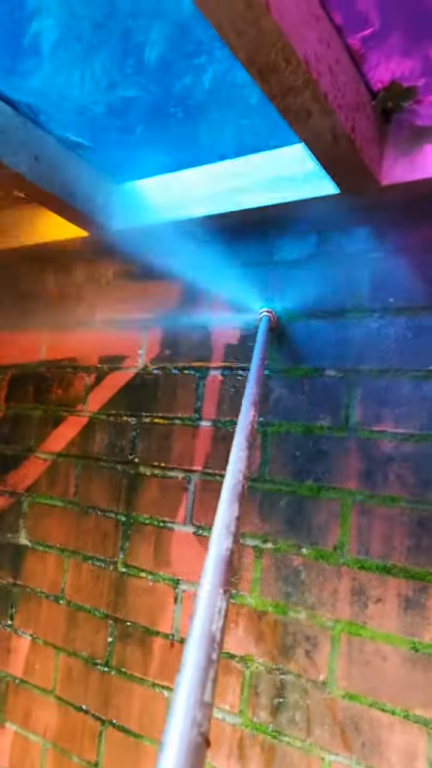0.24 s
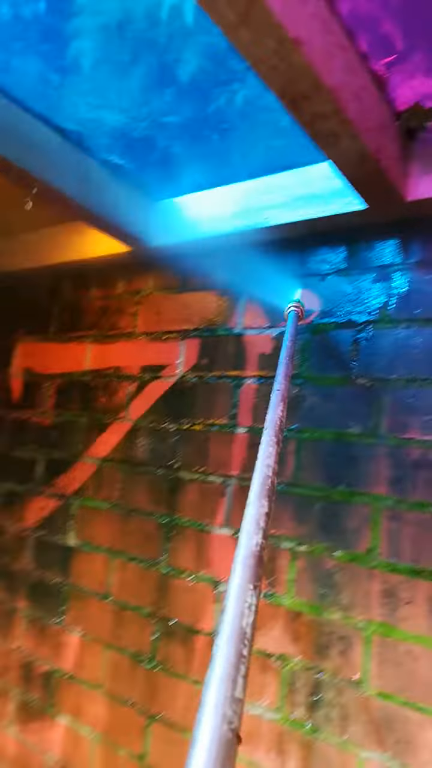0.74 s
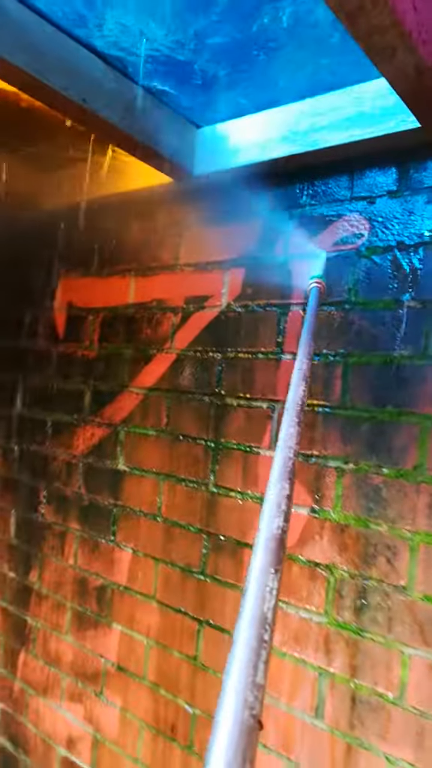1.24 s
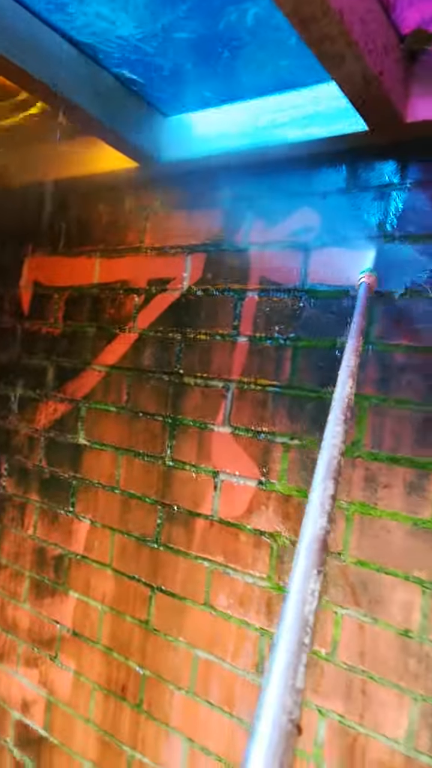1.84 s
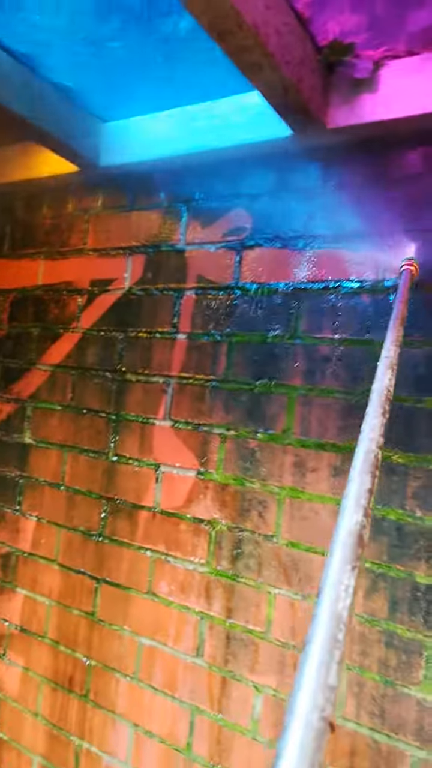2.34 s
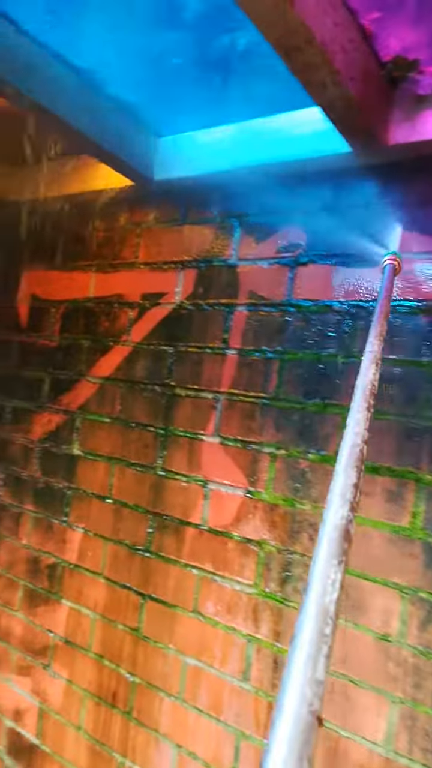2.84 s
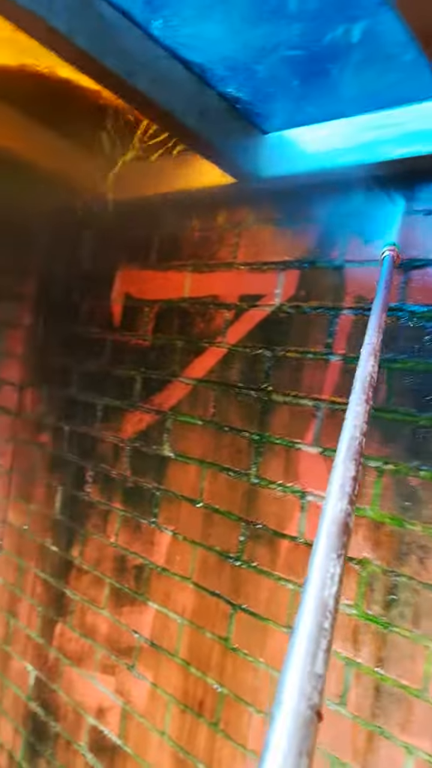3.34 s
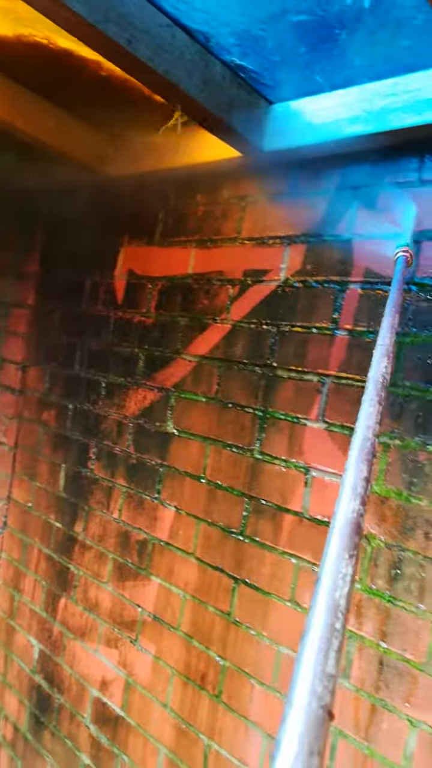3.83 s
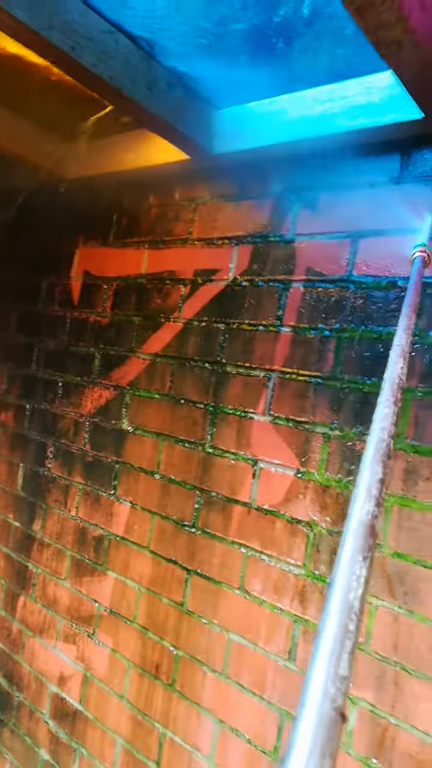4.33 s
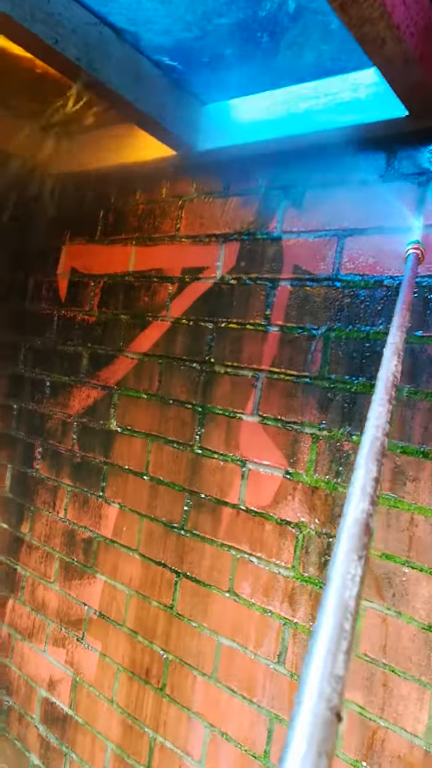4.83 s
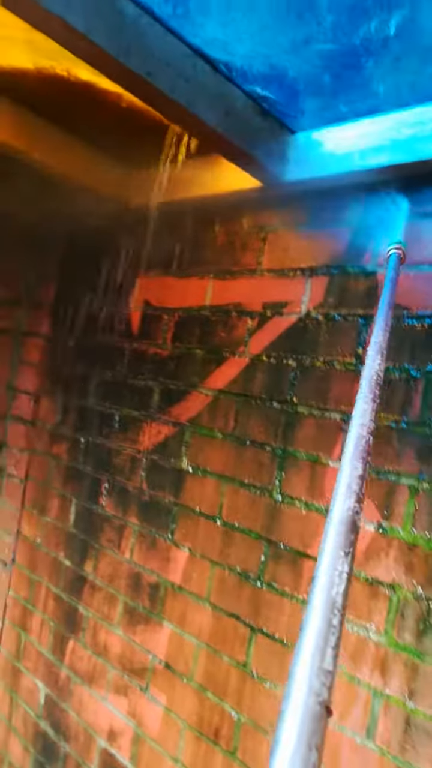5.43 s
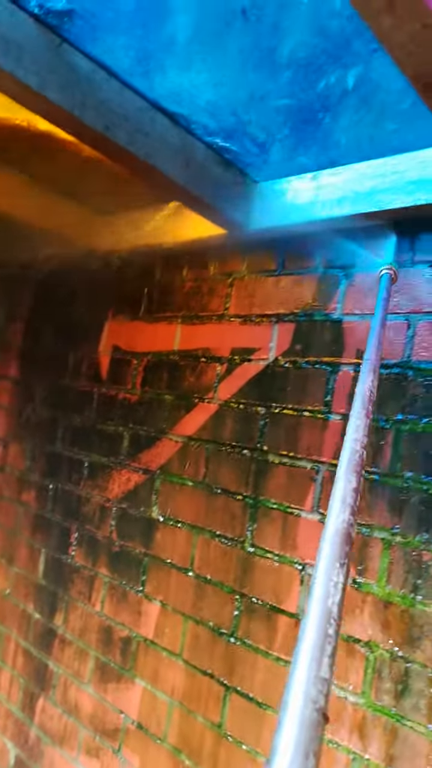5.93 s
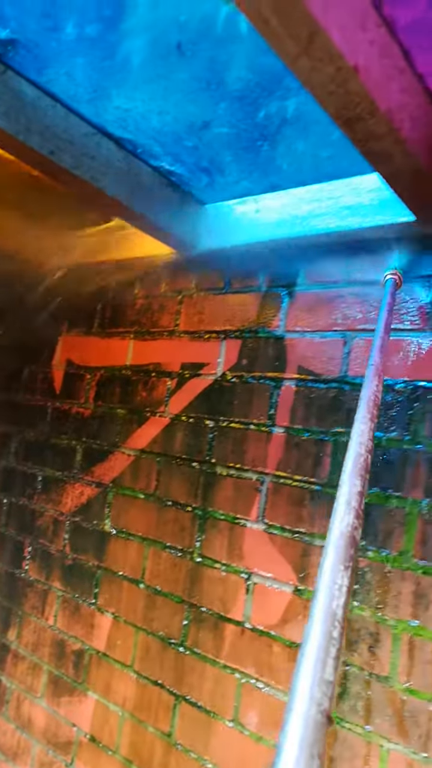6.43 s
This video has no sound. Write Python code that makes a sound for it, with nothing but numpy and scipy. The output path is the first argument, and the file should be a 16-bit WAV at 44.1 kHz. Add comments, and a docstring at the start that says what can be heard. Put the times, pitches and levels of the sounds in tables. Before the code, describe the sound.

Continuous forceful water spray, heard close in a hard brick corner. It starts unsteady, with low rumbling and quick dull thumps, then surges into a fuller splashing hiss. Around the middle it becomes slightly thinner, later duller and roomier with more low roar, then brighter again before easing a little at the end. Steady pump hum and a faint high-pitched motor whine lie underneath, in wide stereo.

```python
"""A pressure washer lance is swept over a brick wall in a corner under a low roof, heard at two ports.
From the start the jet hisses, splashes and roars as turbulent noise, over a pump hum and a thin whine of sines.
Slugs of water soon thump into the corner as ringing modes, and a low buffeting dies away.
Later a hollow opens for a while in the upper hiss; brief spurts break through from about one second on."""
import sys
import numpy as np
from scipy import signal
from scipy.fft import rfft, irfft
from scipy.io import wavfile

SR = 44100
rng = np.random.default_rng(int(sys.argv[2]) if len(sys.argv) > 2 else 0)


def digitize_waveform(pressure):
    """Quantize a signal to 16-bit integers and store it at the path in sys.argv[1].

    Rows of a 2-D input are taken as channels; values are limited to [-1, 1].
    """
    field = np.atleast_2d(pressure).T
    bounded = np.clip(field, -1, 1)
    quanta = np.round(bounded * 32767).astype(np.int16)
    wavfile.write(sys.argv[1], SR, quanta)


def voltage_ratio(level):
    """Linear amplitude factor for a level in decibels (scalar or array-like)."""
    return 10 ** (np.asarray(level, float) / 20)


N = 295470
TIME_S = np.arange(N) / SR


def in_time(rows):
    """Columns of a timed table as straight-line curves, one value a sample."""
    s, *columns = np.transpose(rows)
    return [np.interp(TIME_S, s, column) for column in columns]


def at_hz(points, hz):
    """A (frequency, value) table read on a log-frequency axis."""
    table_hz, values = np.transpose(points)
    return np.interp(np.log(hz), np.log(table_hz), values)


def drift(rate_hz):
    """Slow random curve of spread 1: noise through a double one-pole low-pass at a thinned rate."""
    thin = 40  # samples per value
    r = np.exp(-2 * np.pi * rate_hz * thin / SR)
    noise = rng.standard_normal(N // thin + 2002)
    slow = signal.lfilter([1], [1, -2 * r, r * r], noise)[2000:]  # the run-in is dropped
    return np.interp(np.arange(N) / thin, np.arange(len(slow)), slow / slow.std())


def turbulence(hz):
    """Spectrum of the jet noise at both ports: a shared part that reaches the right late, and one of its own."""
    # spectral colour, air modes of the corner below and spray above: (frequency [Hz], relative density [dB])
    colour = [(20, -30), (45, -15), (72, -23.5), (100, -7.5), (111, -18), (123, -14), (145, -8),
              (180, -16.5), (215, -13), (237, -13.5), (300, -15.5), (350, -8), (440, -18), (560, -13),
              (700, -20), (900, -14.5), (1250, -11.5), (1600, -10), (1850, -5), (2100, -8), (2600, -11),
              (3300, -8), (4000, -7.5), (5000, -5.5), (6600, -4), (8000, -4.5), (11200, -7.5),
              (14200, -7.5), (14900, -4), (15700, -8.5)]
    # unequal colour of the ports: (frequency [Hz], left over right [dB])
    port_balance = [(30, 0), (150, -0.2), (400, 1.5), (700, 4), (950, 3), (1300, -1), (1600, -15),
                    (1850, 1.5), (2100, -12.5), (2500, 3.5), (3300, -0.5), (4500, 1), (6400, 8), (8500, 1),
                    (11000, 3), (13500, 4), (15500, 5.5)]
    # left-right likeness of the noise: (frequency [Hz], likeness [0-1])
    likeness = [(30, 0.9), (80, 0.96), (150, 0.9), (400, 0.78), (700, 0.3), (1300, 0.7), (3300, 0.31),
                (4500, 0.43), (7000, 0), (9000, 0.16), (15000, 0)]
    direct_lag_s, roof_lag_s, roof_share = .0002, .0006, .8

    shared, own = rfft(rng.standard_normal((2, N)))
    direct = np.exp(-2j * np.pi * hz * direct_lag_s)
    by_roof = roof_share * np.exp(-2j * np.pi * hz * roof_lag_s)
    phase = np.unwrap(np.angle(direct + by_roof))
    phase = phase / (1 + (500 / hz) ** 2)  # long waves wrap round and arrive together
    alike = np.clip(at_hz(likeness, hz), 0, 1)
    right = alike * shared * np.exp(1j * phase) + np.sqrt(1 - alike ** 2) * own
    colour_db, half_db = at_hz(colour, hz), at_hz(port_balance, hz) / 2
    return np.array([shared * voltage_ratio(colour_db + half_db), right * voltage_ratio(colour_db - half_db)])


def part_levels():
    """Levels of the seven parts, low to high; rumble, gush and rush follow hiss, roar and splash."""
    # the jet on the wall; hiss rises with its force, roar as a joint or the corner fills:
    # (time [s], hiss level [dB], roar level [dB], splash level [dB], treble level [dB])
    jet_course = [(0.0, -26, -50, -44.5, -22.5), (0.16, -30.5, -52, -42, -27.5),
                  (0.3, -26.5, -45.5, -37.5, -31.5), (0.45, -31, -43.5, -38.5, -31),
                  (0.65, -26, -53, -44, -23), (0.8, -22.5, -58, -35, -22), (1.0, -23, -50.5, -31.5, -21.5),
                  (1.3, -23.5, -53.5, -34, -23.5), (1.4, -21.5, -55, -33, -22),
                  (1.6, -23, -56, -34.5, -21.5), (2.21, -23, -61.5, -38.5, -24.5),
                  (2.27, -26.5, -66, -47.5, -25.5), (2.72, -24.5, -60, -38, -24.5),
                  (3.47, -25, -47, -36.5, -30), (3.8, -24, -52.5, -34.5, -27), (4.1, -24.5, -56, -38, -26),
                  (4.66, -26, -59.5, -38, -26.5), (5.17, -24.5, -52, -36.5, -27),
                  (5.35, -25, -54.5, -37, -29.5), (5.5, -23, -48, -36, -29), (6.4, -25, -58.5, -43, -26),
                  (6.7, -27, -62, -43.5, -29.5)]
    # followers: mean [dB] (the rumble's before buffeting), then dB per dB of hiss, of roar, of splash
    rumble_law = (-52.5, 0.84, 0.68, -0.66)
    gush_law = (-43.5, -0.35, 0.33, 0.62)
    rush_law = (-30.5, 0.7, -0.064, 0.07)
    buffet_db, buffet_end_s, buffet_release_s = 10, .55, .28

    hiss_db, roar_db, splash_db, treble_db = in_time(jet_course)
    swings = np.array([level_db - level_db.mean() for level_db in (hiss_db, roar_db, splash_db)])
    rumble_db, gush_db, rush_db = (law[0] + np.array(law[1:]) @ swings
                                   for law in (rumble_law, gush_law, rush_law))
    # the buffeting holds at first, then dies away
    rumble_db += buffet_db * np.clip(1 - (TIME_S - buffet_end_s) / buffet_release_s, 0, 1)
    return [rumble_db, roar_db, gush_db, splash_db, rush_db, hiss_db, treble_db]


def hollow(spray):
    """A band of the spray is partly cancelled for a while, opening a hollow in the upper hiss."""
    centre_hz, width_hz = 9050, 1140
    deepest_s, half_length_s, share = 2.38, 0.49, 0.41
    edges_hz = [centre_hz - width_hz / 2, centre_hz + width_hz / 2]
    band = signal.lfilter(*signal.butter(1, edges_hz, "band", fs=SR), spray)
    opening = np.exp(-((TIME_S - deepest_s) / half_length_s) ** 4)
    return spray - band * share * opening


def near_echoes(spray):
    """Weak echoes off brick and roof beams, their paths changing with the lance, dapple the spray with dips."""
    count, shortest_s, longest_s = 9, .0002, .012
    wander_s, gain, band_hz = .00005, .13, (500, 9000)
    echoes, sample = np.zeros_like(spray), np.arange(N)
    for delay_s in np.geomspace(shortest_s, longest_s, count):
        for port in range(2):
            lag_s = delay_s * rng.uniform(.85, 1.15) + wander_s * drift(.8)
            echoes[port] += rng.choice([-1, 1]) * np.interp(sample - SR * lag_s, sample, spray[port])
    dulled = signal.sosfilt(signal.butter(2, band_hz, "band", fs=SR, output="sos"), echoes)
    return (spray + gain * dulled) / np.sqrt(1 + count * gain ** 2)  # offsets the added power


def jet():
    """Seven bands of one turbulent noise, each with its own level and flutter; the upper five also surge together."""
    # bands in which the parts are levelled: (low edge [Hz], high edge [Hz])
    level_bands = [(40, 215), (310, 390), (800, 1300), (1400, 2600), (3000, 5200), (5400, 9000),
                   (10000, 15700)]
    # where one part fades into the next: frequency [Hz]
    handovers = [220, 720, 1350, 2800, 5300, 9500]
    # brief spurts as the jet catches an edge: (time [s], rise [dB], half length to 1/e of the rise [s])
    spurts = [(1.127, 1.5, 0.0084), (1.38, 2, 0.0072), (1.571, 1, .01), (2.053, 0.5, .008),
              (2.2, 1, 0.0034), (2.216, 1.5, .004), (3.833, 1.5, 0.011), (5.136, 2.5, 0.014),
              (5.8, 0.5, 0.0086), (6.06, 2, 0.0091), (6.36, 2, 0.019), (6.433, 1.5, 0.0063)]
    # the spray's drift between ports, used as swings about each mean:
    # (time [s], rush and hiss left over right [dB], treble left over right [dB])
    spray_side = [(0.0, 3, -2), (0.4, 3.5, .5), (1.1, 3, -1.5), (2.1, 5, 2), (3.05, 5, 6), (3.5, 4.5, 2.5),
                  (4.7, 6, 6.5), (5.7, 3.5, 7.5), (6.7, 4, 4)]
    own_flutter_db = (1.0, 1.0, .7, .7, .3, .3, .45)

    hz = np.maximum(np.arange(N // 2 + 1) * SR / N, 1)
    noise = turbulence(hz)
    below = [0 * hz] + [1 / (1 + (hz / edge) ** 8) for edge in handovers] + [hz ** 0]
    surge_db = 0.34 * drift(24.0) + 0.2 * drift(83.0)
    for s, rise_db, length_s in spurts:
        surge_db += rise_db * np.exp(-((TIME_S - s) / length_s) ** 2)

    hiss_pan_db, treble_pan_db = in_time(spray_side)
    pans_db = [np.zeros(N)] * 4 + [hiss_pan_db] * 2 + [treble_pan_db]  # only the spray moves across
    parts = []
    for k, (level_db, (low_hz, high_hz)) in enumerate(zip(part_levels(), level_bands)):
        inside = noise.mean(axis=0)[(hz > low_hz) & (hz < high_hz)]
        band_rms = np.sqrt(2 * np.sum(abs(inside) ** 2)) / N  # of the mean of both ports
        part = irfft(noise * (below[k + 1] - below[k]), N) / band_rms
        pan_db = (pans_db[k] - pans_db[k].mean()) / 2 * [[1], [-1]]
        flutter_db = own_flutter_db[k] * drift(8.1)
        if k >= 2:
            flutter_db = flutter_db + surge_db
        parts.append(part * voltage_ratio(level_db + pan_db + flutter_db))
    low_parts, spray = sum(parts[:2]), sum(parts[2:])
    return low_parts + near_echoes(hollow(spray))


def shaft_angle():
    """Motor angle in radians: almost even turning under a steady load."""
    shaft_hz = 46.282
    return 2 * np.pi * shaft_hz * TIME_S + .08 * drift(.3)


def pump(turn):
    """Pump and motor hum: multiples of the shaft speed, each wavering slowly at each port, all swelling as one."""
    # tones, rms before waver and swell:
    # (multiple of shaft speed, left level [dB], right level [dB], left phase lead [rad])
    shaft_orders = [(3, -56, -58, -.7), (5, -59, -60, .2), (6, -45, -45, .6), (7, -60, -64, 1.8),
                    (9, -50, -51, .6), (10, -64, -61, -1.2), (11, -50, -54, -2.7), (12, -57, -57, -.6),
                    (14, -58, -56, -.2), (15, -59, -53, 2.2), (16, -61, -57, -1.5), (17, -63, -52, -1.1),
                    (18, -60, -56, 1.8), (19, -65, -54, -1.5), (21, -59, -60, .5), (24, -61, -57, .2),
                    (27, -56.5, -52.5, .2), (28, -60, -58, .5), (33, -60, -57, -.2)]
    # swell of the strongest low tone, used for all as swings about its mean: (time [s], level [dB])
    hum_swell = [(0.0, -42), (1.94, -40.5), (2.46, -42.5), (6.7, -44)]
    hum = np.zeros((2, N))
    for order, left_db, right_db, lead in shaft_orders:
        angle = order * turn + rng.uniform(0, 2 * np.pi)
        waver_db = (.5 + .08 * order) * np.array([drift(.6), drift(.6)])  # short waves waver more
        gain = voltage_ratio(waver_db + [[left_db], [right_db]])
        hum += gain * np.sqrt(2) * np.sin([angle + lead, angle])
    swell_db = in_time(hum_swell)[0]
    return hum * voltage_ratio(swell_db - swell_db.mean())


def whine(turn):
    """The thirteenth shaft order is a thin whine, far stronger at the right port for most of the time."""
    # swelling and sinking as the ports move through its standing wave:
    # (time [s], level before waver, half the root of both ports' summed power [dB], left over right [dB])
    standing_wave = [(0.0, -41, 6), (0.5, -39, -3), (0.75, -37.5, -14), (1.34, -35.5, -16),
                     (2.03, -37, -22), (2.39, -40.5, -19), (3.36, -36, -11), (4.6, -38.5, -16),
                     (5.22, -38.5, -17), (6.03, -39, -16), (6.7, -39.5, -19)]
    level_db, pan_db = in_time(standing_wave)
    angle, left_over_right = 13 * turn, voltage_ratio(pan_db)
    level = voltage_ratio(level_db + .3 * drift(4.0))
    right_peak = 2 * np.sqrt(2) * level / np.sqrt(1 + left_over_right ** 2)
    left = left_over_right * np.sin(angle - np.pi / 2 + .5 * drift(.5))
    return right_peak * np.array([left, np.sin(angle)])


def thumps():
    """Each slug of water strikes the corner's air modes, decaying resonators, with strengths of its own."""
    # slugs thumping into the corner: (time [s], relative strength [dB])
    slugs = [(0.268, -23), (0.294, -20), (0.338, -21), (0.378, -24), (0.471, -19.5)]
    # air modes of the corner: (frequency [Hz], relative level [dB], decay by 60 dB [s])
    air_modes = [(135, -0.5, 0.17), (240, 0.5, 0.081), (347, -11, 0.048)]
    at, out = [round(s * SR) for s, _ in slugs], np.zeros(N)
    slug_db = np.array(slugs)[:, 1]
    for hz, mode_db, t60_s in air_modes:
        blows = np.full(N, 1e-18)  # a trace keeps the resonator clear of vanishing numbers
        blows[at] = voltage_ratio(slug_db + mode_db - 8 + rng.normal(0, 1.1, len(at)))
        r, w = voltage_ratio(-60 / (t60_s * SR)), 2 * np.pi * hz / SR
        out += signal.lfilter([.5, 0, -.5], [1, -2 * r * np.cos(w), r * r], blows)
    return out


def scene():
    """Jet, pump, whine and thumps together; hum and whine share one shaft."""
    turn = shaft_angle()
    return jet() + pump(turn) + whine(turn) + thumps()


def band_limit(x):
    """A steep low-pass at the top of the band."""
    return signal.sosfilt(signal.butter(12, 17100, fs=SR, output="sos"), x)


def record(dry):
    """The top is cut steeply by an elliptic low-pass."""
    steep = signal.ellip(14, .5, 80, 15735, fs=SR, output="sos")  # order, ripple dB, stop dB, edge Hz
    mix = signal.sosfilt(steep, dry)
    return band_limit(mix)


dry = scene()
out = record(dry)
digitize_waveform(out)
```